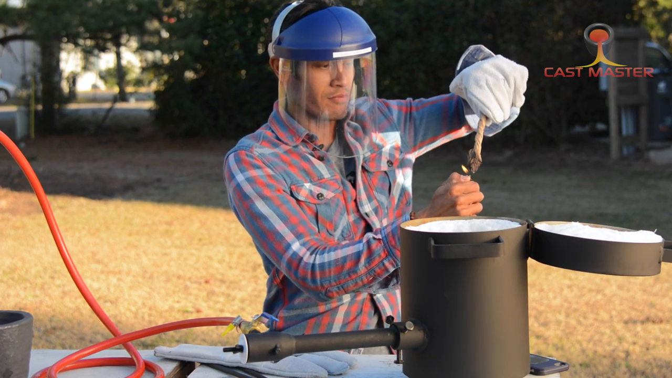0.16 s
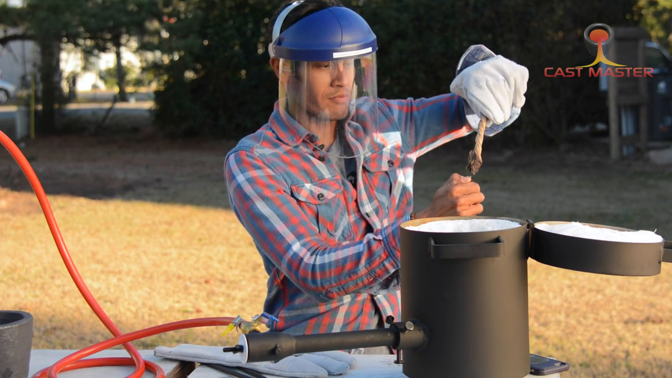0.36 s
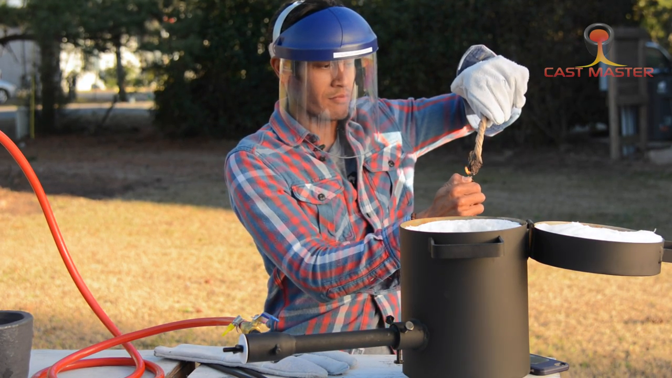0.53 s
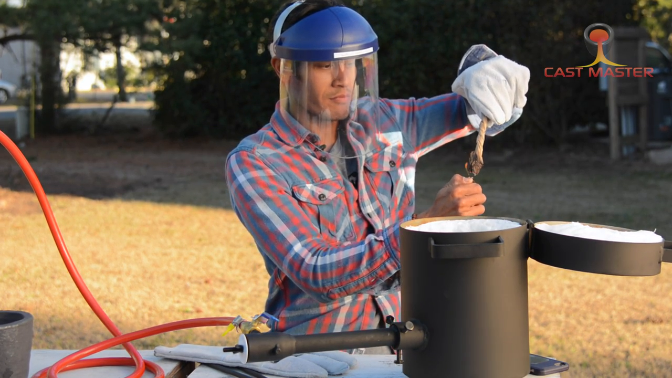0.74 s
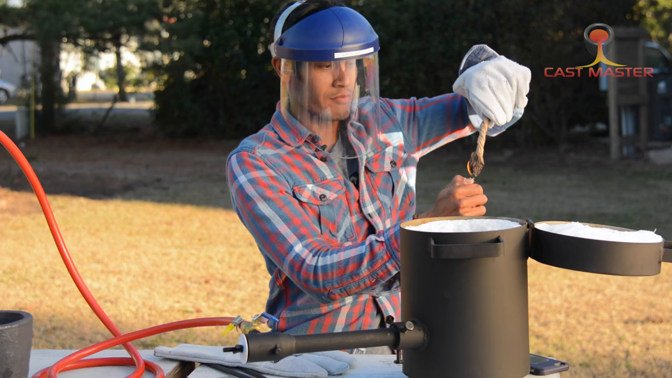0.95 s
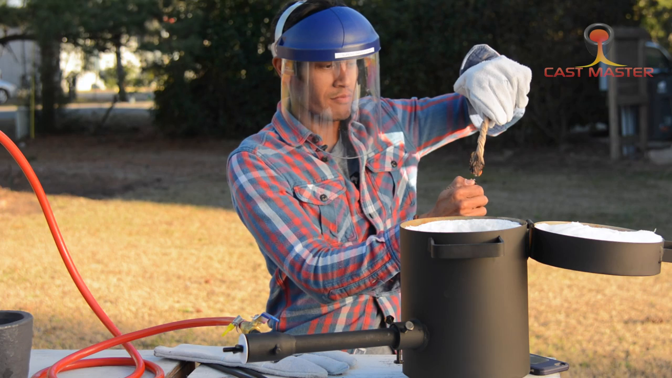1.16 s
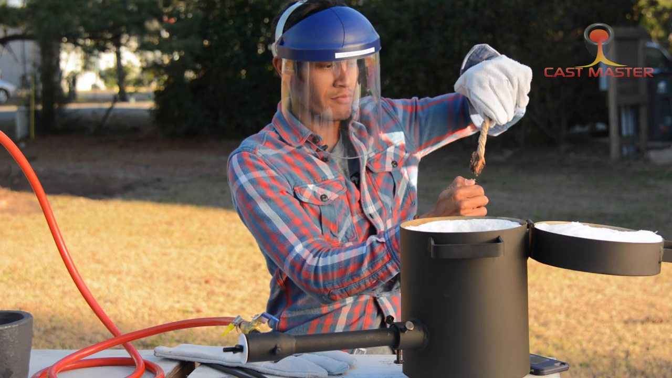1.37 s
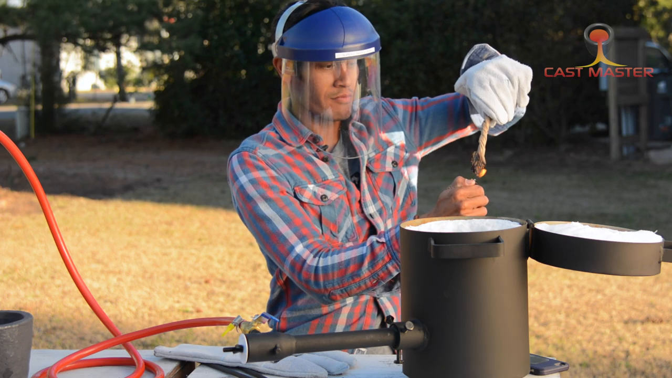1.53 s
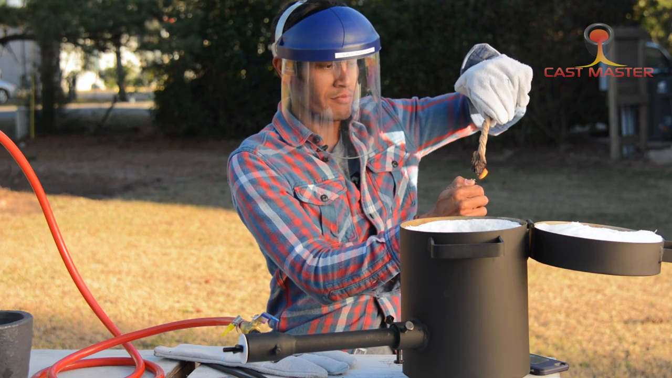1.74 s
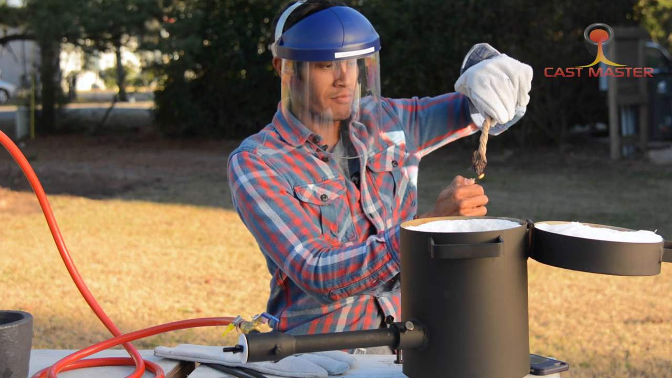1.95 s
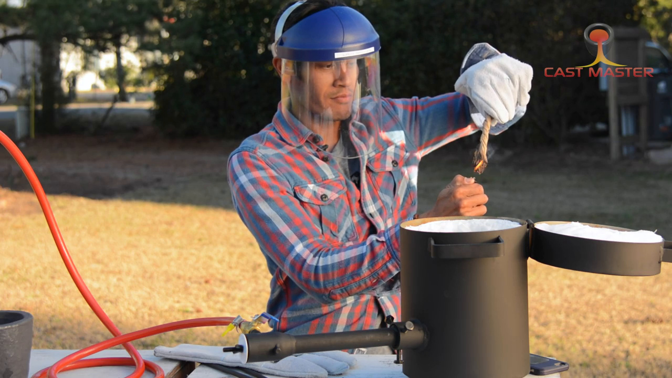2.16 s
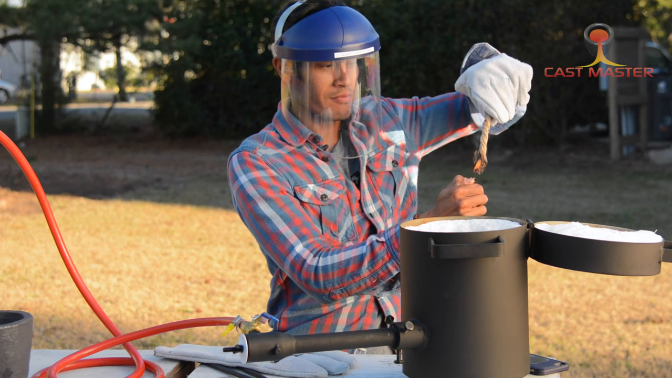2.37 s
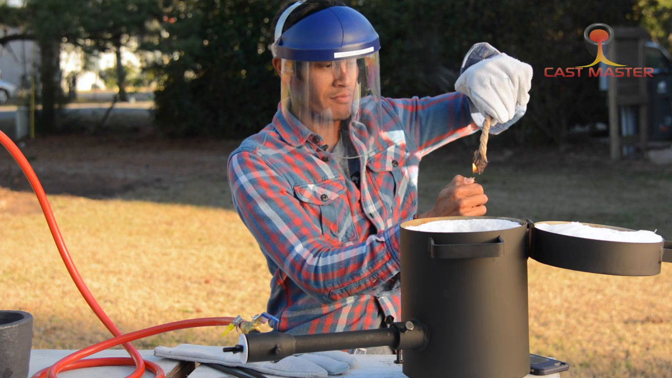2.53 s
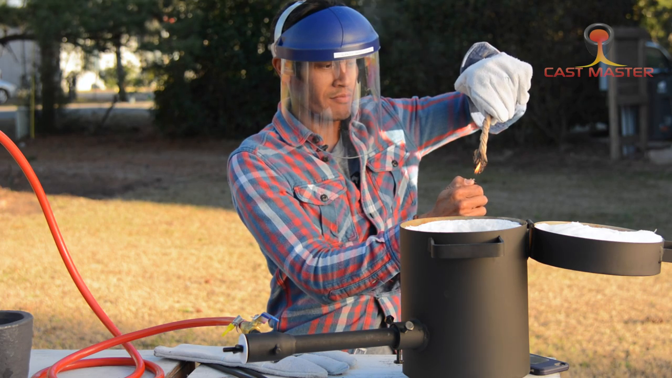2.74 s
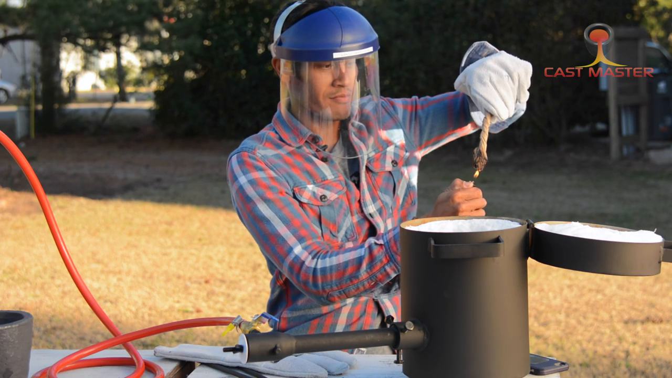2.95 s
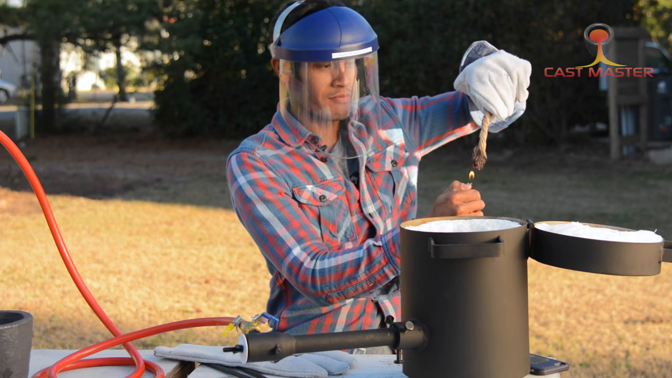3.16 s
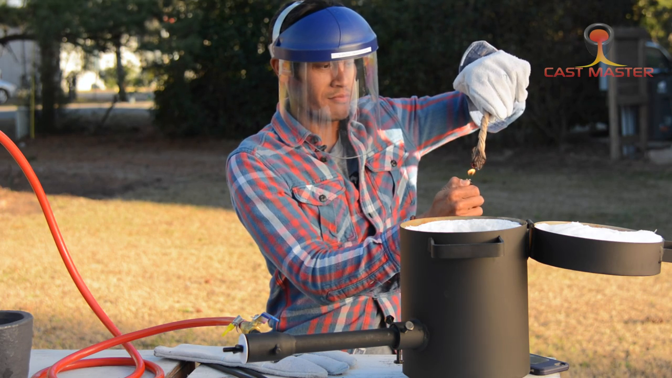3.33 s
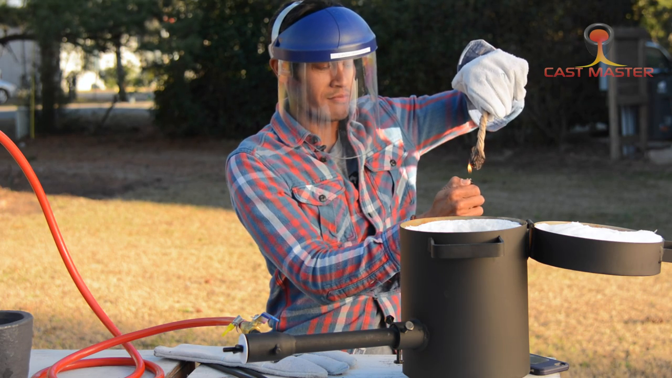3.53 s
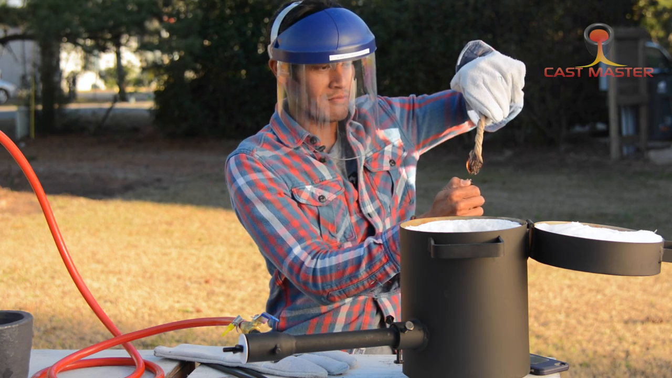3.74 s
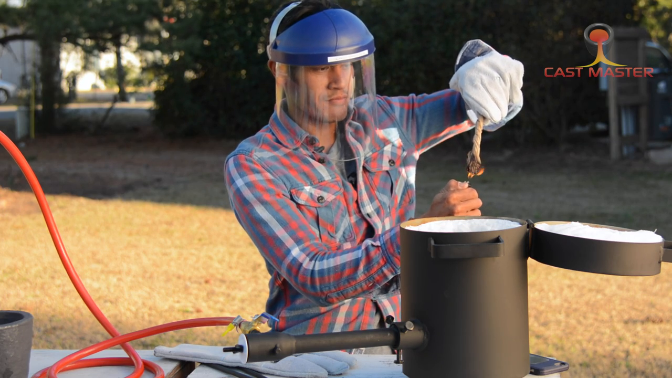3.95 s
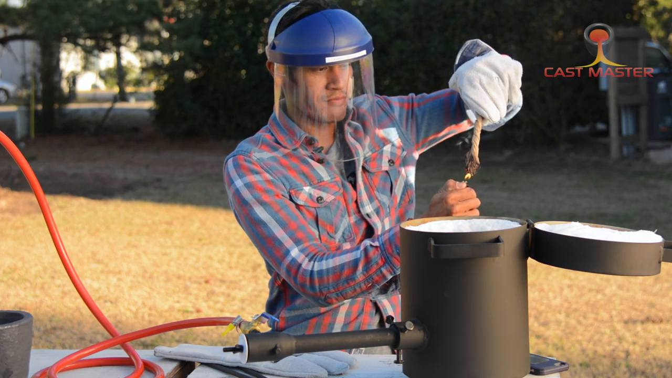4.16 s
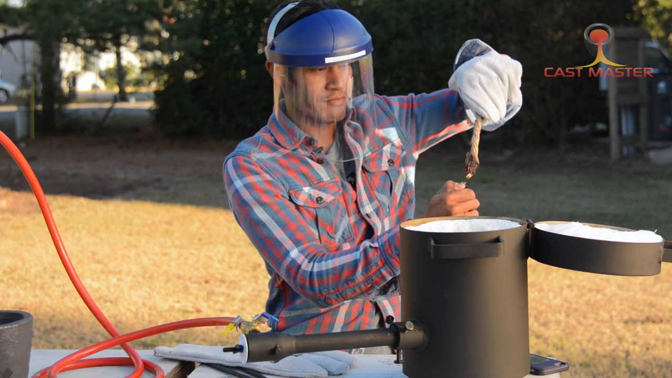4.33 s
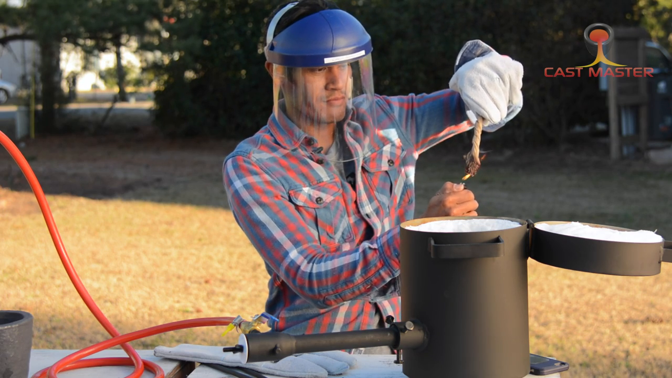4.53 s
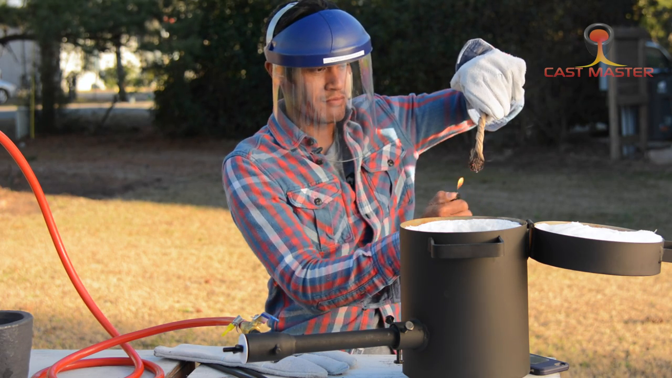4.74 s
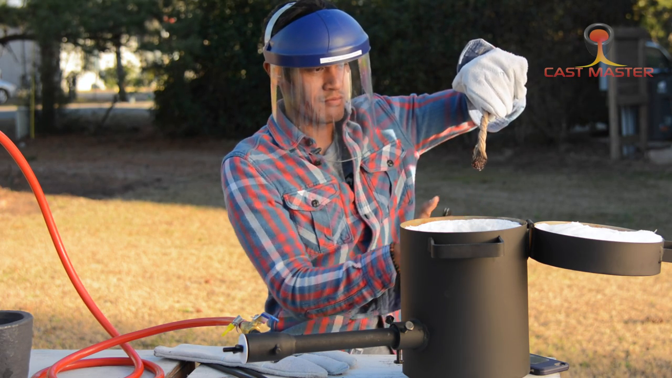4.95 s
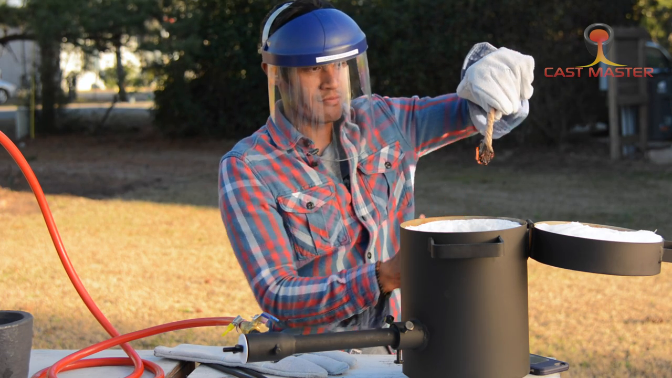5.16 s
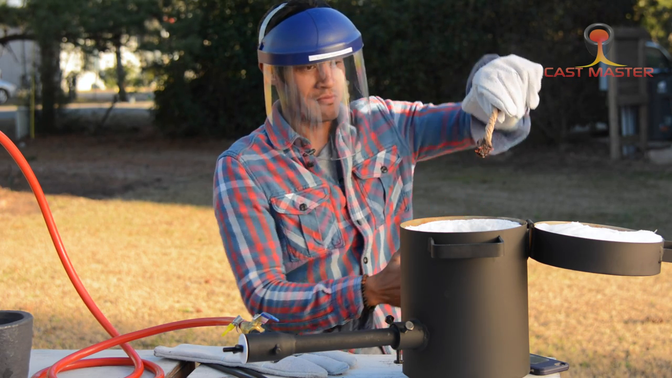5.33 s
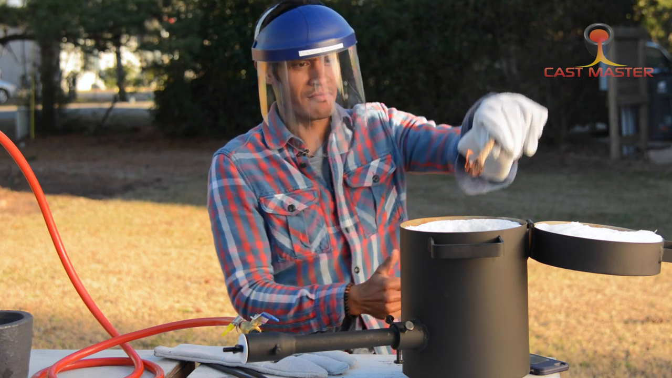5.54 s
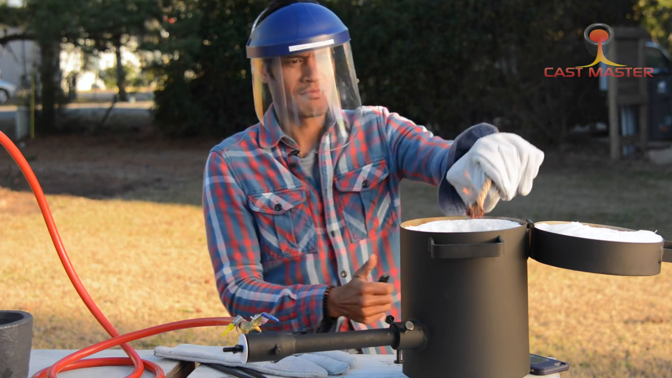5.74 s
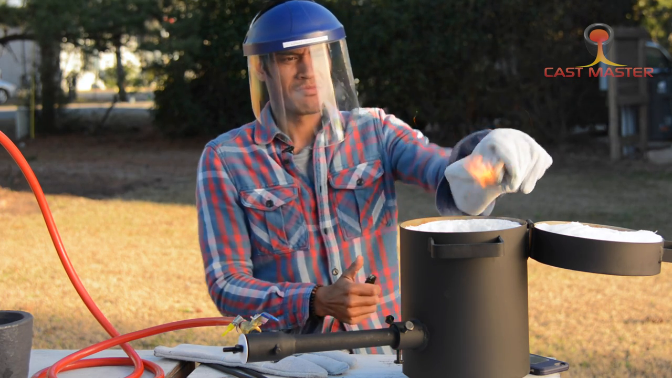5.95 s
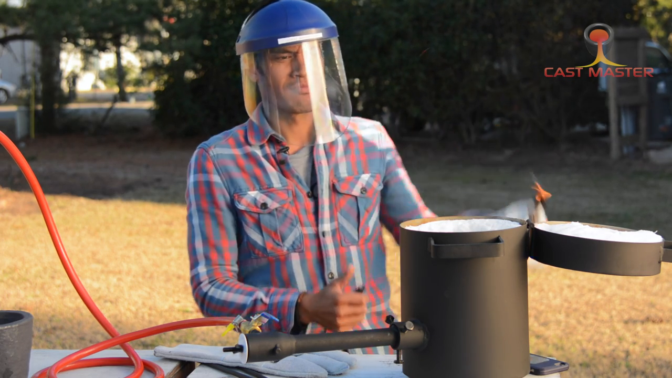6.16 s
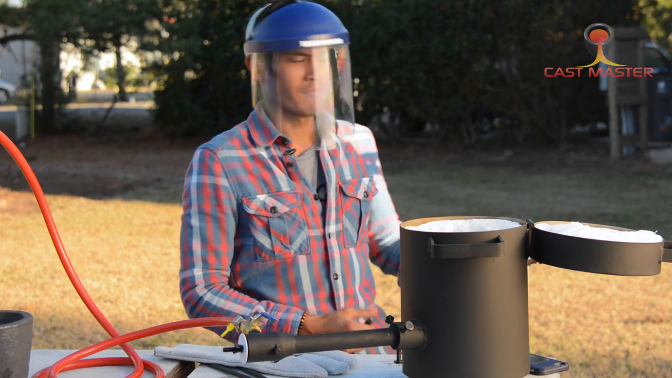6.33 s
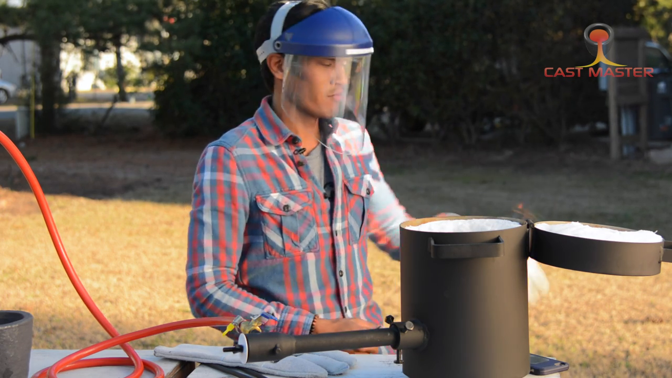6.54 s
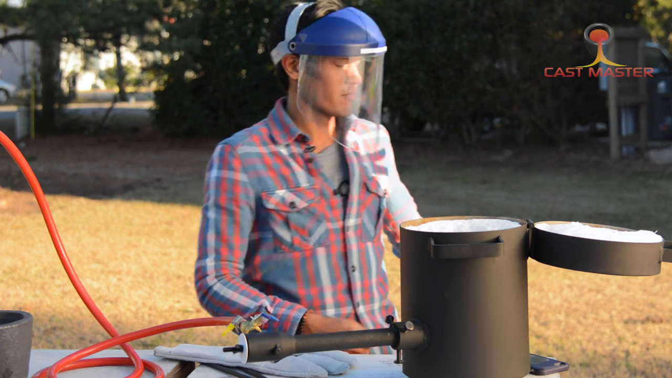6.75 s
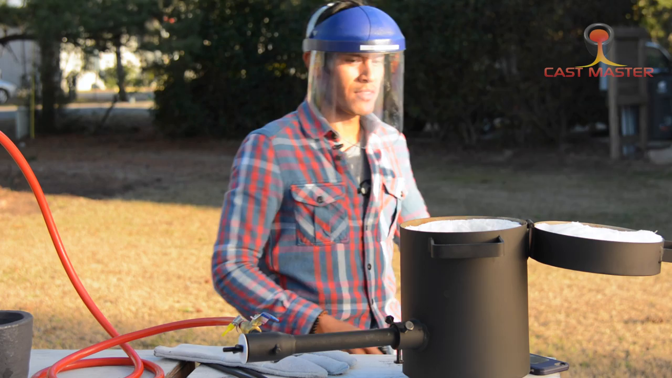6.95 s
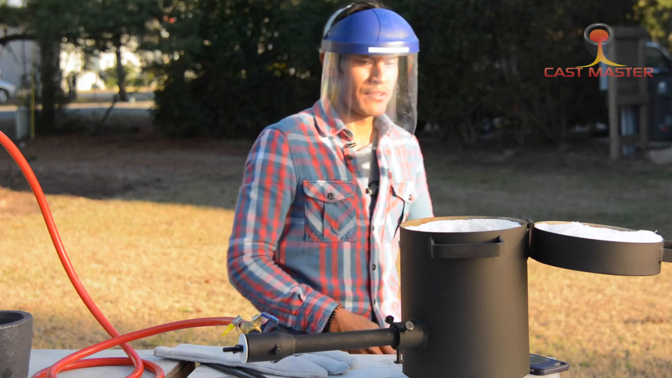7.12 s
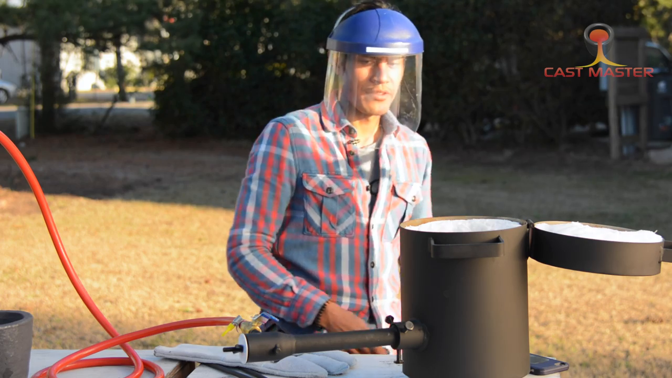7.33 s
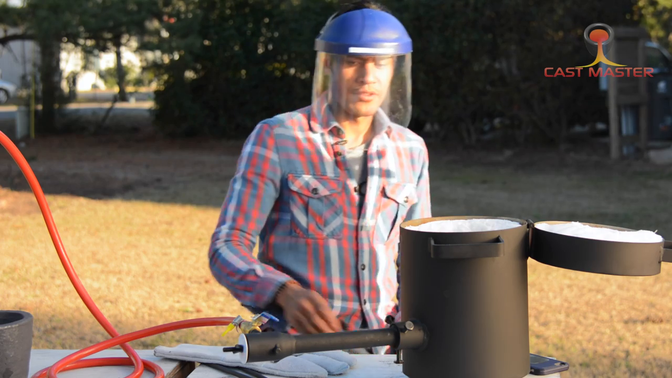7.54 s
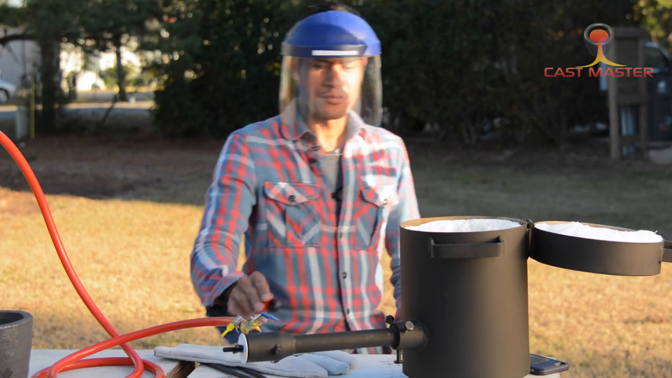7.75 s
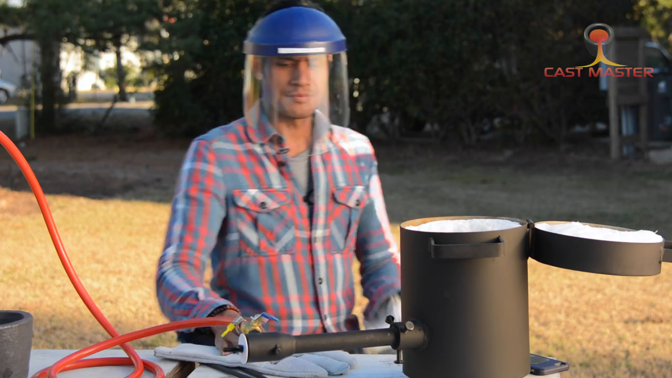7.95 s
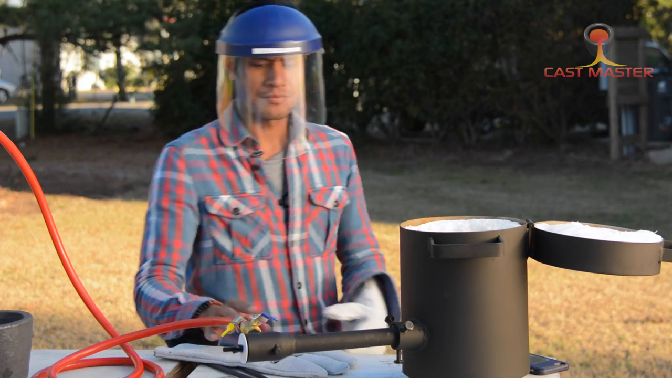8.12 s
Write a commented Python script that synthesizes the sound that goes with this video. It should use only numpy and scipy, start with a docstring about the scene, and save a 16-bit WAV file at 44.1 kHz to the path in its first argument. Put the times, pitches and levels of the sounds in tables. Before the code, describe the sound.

Faint gas hiss and light ticks, then a furnace burner catches with a soft whump and roars steadily outdoors.

```python
"""A small propane furnace is lit in a garden. From the start, gas hisses through the burner tube and
rushes into the open drum, and a far bird chirps twice. Around 5 s the worker leans back and the hiss
opens up. A flame creeps along a burning scrap, spreads, catches the gathered gas with a soft whump
at 6 s and roars on in the drum's resonances. Just before and after it catches, the tube whistles
faintly and the lighter and burner tick as they are handled."""
import sys
import numpy as np
from scipy import signal
from scipy.fft import rfft, irfft, next_fast_len
from scipy.io import wavfile
from scipy.ndimage import uniform_filter1d, map_coordinates

SR = 44100
rng = np.random.default_rng(int(sys.argv[2]) if len(sys.argv) > 2 else 0)


def log_audio(samples):
    """Write samples as a 16-bit WAV file to the path given in sys.argv[1]."""
    # one column per channel
    frames = np.atleast_2d(samples).T
    # limit to full scale, then quantise
    limited = np.clip(frames, -1, 1)
    pcm = np.round(limited * 32767).astype(np.int16)
    wavfile.write(sys.argv[1], SR, pcm)


N = 365588
TIME = np.arange(N) / SR

KINDLE_S, SPREAD_S, WHUMP_S = 5.708, 5.866, 5.979  # the scrap kindles, the flame spreads, the gas catches
# The deep body of the roar leaving the drum. Each row: frequency in Hz, relative level in dB.
ROAR_COLOUR = [(25, -70.5), (55, -52.5), (80, -28.5), (105, -19.5), (140, -7.5), (220, -4.5), (320, 1),
               (400, -4), (510, -11.5), (680, -31.5), (1000, -32), (1550, -51.5), (2200, -58), (4500, -75)]
# The hollow ring of the air in the drum. Each row: centre in Hz, width in Hz, lift in dB.
DRUM_MODES = [(330, 84, 2), (675, 99, -4.5), (762, 99, 5.5), (867, 65, 5), (1380, 92, 9), (1760, 150, 11.5),
              (2400, 92, 10.5), (2920, 95, 14.5)]
# The young flame at the mouth, hardly ringing the drum. Each row: frequency in Hz, relative level in dB.
MOUTH_COLOUR = [(30, -38), (110, 0), (260, 4), (520, -5), (680, -11), (900, -9.5), (1300, -23), (2000, -27),
                (4500, -67)]


def flame():
    """Burning eddies move from the mouth into the drum and ring it; the front flutters as it draws air."""
    flutter_db = 1.12 * walk(rate_hz=34.98)
    surge_db = 0.5 * walk(rate_hz=7)
    burning = eddies(per_second=5000, scatter_db=2) * undb(flutter_db + surge_db)
    in_drum = colour(burning, ROAR_COLOUR, DRUM_MODES)
    at_mouth = colour(burning, MOUTH_COLOUR)
    inside = np.clip((TIME - SPREAD_S) / 0.079, 0, 1)  # 79 ms to move inside
    return undb(flame_db()) * (np.sqrt(inside) * in_drum + np.sqrt(1 - inside) * at_mouth)


def eddies(per_second, scatter_db):
    """Pockets of gas burn at random moments, each a pressure kick of its own size."""
    hits = rng.random(N) < per_second / SR
    polarity = np.sign(rng.standard_normal(N))
    return unit(hits * polarity * undb(scatter_db * rng.standard_normal(N)))


def flame_db(kindle_db=-60.5, creep_db_per_s=56, spread_db_per_s=194, settled_db=-29.5):
    """The flame's level: a slow creep, a fast spread, then a roar that settles and follows the gas jet."""
    fade_in = spread_db_per_s * np.minimum(TIME - KINDLE_S, 0)
    creep = creep_db_per_s * (np.minimum(TIME, SPREAD_S) - KINDLE_S)
    spread = spread_db_per_s * np.maximum(TIME - SPREAD_S, 0)
    surplus = 2.5 * swell(WHUMP_S, half_s=0.79)  # gathered gas feeds a louder flame at first
    starved = 3 * swell(WHUMP_S + 0.14, half_s=0.098)  # the flash uses up the air for a moment
    hiss_db = curve(JET_LEVEL)
    feed = 0.51 * (hiss_db - hiss_db[TIME > WHUMP_S].mean())
    return np.minimum(kindle_db + fade_in + creep + spread, settled_db + surplus - starved + feed)


# The dull weight of the flash. Each row: frequency in Hz, relative level in dB before saturation.
FLASH_COLOUR = [(25, -47), (60, -13), (130, -1.5), (300, -2.5), (500, -7.5), (660, -46), (850, -22),
                (1200, -55), (2000, -29), (5000, -62)]


def whump(level_db=-23.5):
    """Gas gathered in the drum burns all at once: a short, deep swell."""
    envelope = swell(WHUMP_S, half_s=0.021)
    # saturation evens out the pressure swings, so the swell sounds full
    swings = np.tanh(1.16 * colour(rng.standard_normal(N), FLASH_COLOUR))
    burst = envelope * filtered(swings, lambda hz: 1 / (1 + (hz / 950) ** 3) / (1 + (80 / hz) ** 4))
    return undb(level_db) * burst * np.sqrt(np.sum(envelope ** 2) / np.sum(burst ** 2))


# The hiss, steady until the worker moves. Each row: time in seconds, level of its core band in dB.
JET_LEVEL = [(4.85, -74.5), (5.4, -72.5), (5.8, -71), (6.14, -68.5), (6.45, -69), (7.25, -70.5),
             (7.68, -72.5), (8.0, -71.8), (8.22, -68)]
# The worker leans back from the burner. Each row: time in seconds, share from 0 (screened) to 1 (open).
OPEN_SHARE = [(4.6, 0), (5.4, 1), (5.9, 0.94)]
# The broad tone of the hiss. Each row: frequency in Hz, relative dB screened, relative dB in the open.
HISS_COLOUR = [(1500, -16, -19.5), (2220, 0, -6), (3520, -11.5, -6), (4370, -12, -9), (5660, -8, -7.5),
               (7350, -14, -8), (8400, -2.5, -2.5), (10250, 0, 1.5), (12200, -4.5, -5.5), (13500, -1, -3.5),
               (15700, -14.5, -15)]
# The burner tube's ring. Each row: centre in Hz, width in Hz, lift in dB screened, lift in dB in the open.
TUBE_MODES = [(3063, 130, 8, 5), (3256, 170, 11, -3.5), (3500, 200, 4.5, 6.5), (3820, 300, 10, -3.5),
              (5095, 88, 6, 8.5), (5640, 180, 11, 2), (5730, 140, -7, 2.5), (6260, 130, 3.5, 7),
              (6720, 140, 11, 10.5), (7990, 200, 8, 9.5), (8800, 140, 1.5, -3), (8900, 110, 0.5, 7.5),
              (9780, 200, 10.5, 7.5), (10100, 150, 1, -2), (11120, 170, 7, -2), (11400, 170, 10, 9.5),
              (12700, 200, 7, 1), (13835, 100, 15.5, 10), (14400, 150, 6, 2)]
# The top sizzle, beamed and shaded on its own. Each row: time in seconds, level in dB against the core.
SIZZLE_LEVEL = [(5.15, -2), (5.5, -6), (6.0, -3), (6.28, -5), (6.5, -11), (7.25, -8.5), (7.8, -10),
                (8.0, -5), (8.22, -8.5)]


def gas_jet():
    """Gas leaving the nozzle hisses in the tube's resonances, screened by the worker, then in the open."""
    tone, tube = np.array(HISS_COLOUR), np.array(TUBE_MODES)
    screened = colour(rng.standard_normal(N), tone[:, [0, 1]], tube[:, [0, 1, 2]])
    in_open = colour(rng.standard_normal(N), tone[:, [0, 2]], tube[:, [0, 1, 3]])
    in_open = unit(tube_waver(body_echo(in_open)))
    share = np.clip(curve(OPEN_SHARE), 0, 1)
    hiss = np.sqrt(1 - share) * screened + np.sqrt(share) * in_open
    low = undb(-5 - 3 * share) * steady_band(hiss, 0, 4600)
    mid = undb(-9 + 0.6 * share) * steady_band(hiss, 4600, 7300)
    core = steady_band(hiss, 7300, 12200)
    sizzle = undb(curve(SIZZLE_LEVEL)) * steady_band(hiss, 12200, SR)
    return undb(curve(JET_LEVEL)) * (low + mid + core + sizzle)


def body_echo(hiss, delay_s=0.0016, sway_s=0.00007, strength=0.3):
    """A reflection off the swaying worker combs the hiss and shifts its colour."""
    lag_s = delay_s + sway_s * walk(rate_hz=1.6)
    return hiss + strength * map_coordinates(hiss, [np.arange(N) - lag_s * SR], order=2)


def tube_waver(hiss, groups=5, depth_db=2.4):
    """The tube's resonances swell and fade at random, in interleaved groups."""
    out = hiss
    for first in range(groups):
        modes = TUBE_MODES[first::groups]
        ring = filtered(hiss, lambda hz: sum(np.exp(-((hz - at) / width) ** 2) for at, width, *_ in modes))
        out = out + (undb(depth_db * walk(rate_hz=3.5)) - 1) * ring
    return out


# Single resonances singing out. Each row: peak time and half length in seconds, pitch in Hz, level in dB.
TUBE_WHISTLES = [(5.52, .2, 6320, -83), (6.104, 0.37, 5080, -81.5), (6.15, 0.37, 13835, -76),
                 (6.363, 0.088, 3010, -78.5), (6.72, 0.22, 5740, -79.5), (7.197, 0.34, 6760, -83),
                 (7.857, .11, 3020, -78.5), (8.0, .08, 13835, -78), (8.208, 0.24, 1784, -70.5)]


def tube_whistles(half_width_hz=55):
    """Narrow, breathy tones of the burner tube swell and fade."""
    out = np.zeros(N)
    for at, half_s, pitch, db in TUBE_WHISTLES:
        tone = filtered(rng.standard_normal(N), lambda hz: 1 / (1 + ((hz - pitch) / half_width_hz) ** 2))
        out += undb(db) * swell(at, half_s) * unit(tone)
    return out


# Light touches on the lighter and burner. Each row: start in seconds, peak level in dB, centre in Hz,
# width in octaves, seconds to die away by 60 dB.
HANDLING_TICKS = [(5.3414, -53.5, 5300, 0.7, 0.011), (6.02, -62, 4900, .15, .013),
                  (7.146, -49.5, 5200, 0.69, 0.018), (7.2136, -54, 6500, .5, .014),
                  (7.237, -43.5, 1150, 1.46, 0.031), (7.349, -56, 4500, 0.68, 0.049),
                  (7.8671, -60, 5600, .5, .011)]
# The broad tone of a touch. Each row: frequency in Hz, relative level in dB.
CONTACT_COLOUR = [(900, 0), (2000, -8), (4200, -14), (8000, -13), (12000, -20)]
# The ring of small metal parts. Each row: centre in Hz, width in Hz, lift in dB.
METAL_MODES = [(1190, 550, 14), (2910, 900, 6), (4900, 700, 1.5), (7800, 830, 14)]


def handling_ticks():
    """Small metal parts touch: each contact excites a band of their modes for a few hundredths of a second."""
    out = np.zeros(N)
    lead = SR // 500  # 2 ms of room ahead of the attack
    t = (np.arange(SR // 10) - lead) / SR
    for at, db, centre, octaves, t60 in HANDLING_TICKS:
        contact = rng.standard_normal(len(t)) * (t >= 0) * np.exp(-np.log(1000) * t / t60)
        ring = colour(contact, CONTACT_COLOUR, METAL_MODES)
        tick = filtered(ring, lambda hz: np.exp(-0.5 * (np.log2(hz / centre) / octaves) ** 2))
        start = int(at * SR) - lead
        out[start:start + len(t)] += undb(db) * tick / np.abs(tick).max()
    return out


# The low bed of gas and garden air. Each row: frequency in Hz, relative level in dB.
RUSH_COLOUR = [(25, -35.5), (45, -15.5), (68, -12.5), (90, -5), (130, 1.5), (190, -3), (270, -3.5),
               (370, -8.5), (540, -7), (1000, -8.5), (1500, -15), (2000, -25), (3000, -46.5), (4500, -47.5)]
# The bumps and hollows in that bed. Each row: centre in Hz, width in Hz, lift in dB.
RUSH_RESONANCES = [(566, 220, 4.5), (713, 140, -6.5), (870, 190, 2), (1199, 130, -6), (1670, 120, 1.5)]


def gas_rush(level_db=-63):
    """Unlit gas streams through the drum, over the soft air of the garden."""
    drift_db = 0.48 * walk(rate_hz=6.4)
    return undb(level_db + drift_db) * colour(rng.standard_normal(N), RUSH_COLOUR, RUSH_RESONANCES)


# Two tiny chirps. Each row: start and length in seconds, first and last pitch in Hz, peak level in dB.
BIRD_CHIRPS = [(0.407, 0.03, 7950, 7680, -75), (0.83, 0.036, 6200, 8100, -66.5)]


def bird():
    """A far bird's thin whistles glide quickly and level off."""
    out = np.zeros(N)
    for at, length, from_hz, to_hz, db in BIRD_CHIRPS:
        progress = np.linspace(0, 1, int(length * SR))
        hz = to_hz + (from_hz - to_hz) * (1 - progress) ** 1.7
        envelope = np.sin(np.pi * progress ** 1.6)
        start = int(at * SR)
        out[start:start + len(hz)] += undb(db) * envelope * np.sin(2 * np.pi * np.cumsum(hz) / SR)
    return out


def undb(db):
    """Decibels to gain."""
    return 10 ** (np.asarray(db) / 20)


def unit(x):
    """Scale to rms 1."""
    return x / np.sqrt(np.mean(x ** 2))


def curve(rows):
    """Join (seconds, value) rows by straight lines, holding the first and last value."""
    return np.interp(TIME, *np.transpose(rows))


def swell(peak_s, half_s):
    """A bell-shaped envelope: 1 at its peak, 1/e at half_s to either side."""
    return np.exp(-((TIME - peak_s) / half_s) ** 2)


def walk(rate_hz):
    """A smooth random wobble of rms 1: held random steps, slewed twice."""
    hold = max(int(SR / rate_hz), 2)
    steps = np.repeat(rng.standard_normal(N // hold + 1), hold)
    return unit(uniform_filter1d(uniform_filter1d(steps, hold), hold)[:N])


def filtered(x, gain_at):
    """Apply a gain given as a function of frequency."""
    size = next_fast_len(len(x), True)
    hz = np.maximum(np.fft.rfftfreq(size, 1 / SR), 1)
    return irfft(rfft(x, size) * gain_at(hz), size)[:len(x)]


def colour(x, points, modes=()):
    """Shape x with a broad tone curve and resonances on top, then scale to rms 1."""
    point_hz, point_db = np.transpose(points)
    grid = np.geomspace(1, SR / 2, 6000)
    gain_db = np.interp(np.log(grid), np.log(point_hz), point_db)
    for centre, width, lift in modes:
        gain_db += lift / (1 + (2 * (grid - centre) / width) ** 2)
    roll_off = np.minimum(grid / point_hz[0], 1) ** 2 * np.minimum(point_hz[-1] / grid, 1) ** 2
    return unit(filtered(x, lambda hz: np.interp(hz, grid, undb(gain_db) * roll_off)))


def steady_band(x, lo_hz, hi_hz):
    """The part of x between two frequencies, held at rms 1 over half a second."""
    part = filtered(x, lambda hz: (hz >= lo_hz) & (hz < hi_hz))
    return part / np.sqrt(uniform_filter1d(part ** 2, SR // 2))


def scene():
    """The furnace and the garden in the open air, mixed to mono."""
    return (flame() + whump() + gas_jet() + tube_whistles() + handling_ticks() + gas_rush() + bird())[None]


def record(dry, top_hz=15650):
    """A steep low-pass takes off the very top of the hiss."""
    return signal.sosfilt(signal.ellip(14, 0.1, 80, top_hz, fs=SR, output="sos"), dry)


dry = scene()
out = record(dry)
log_audio(out)
```